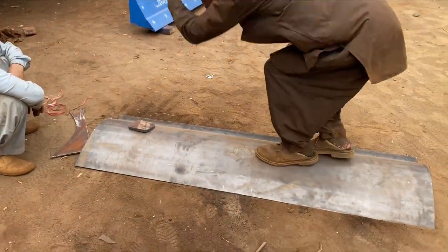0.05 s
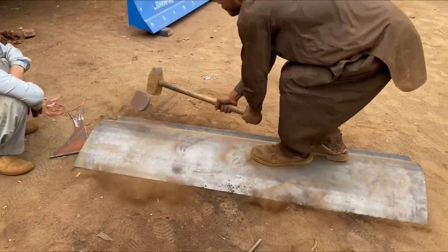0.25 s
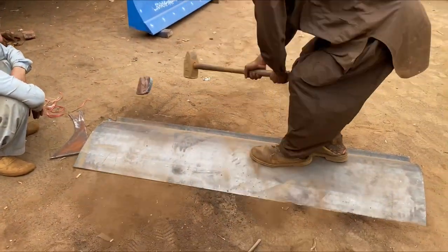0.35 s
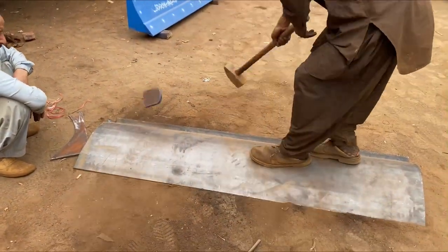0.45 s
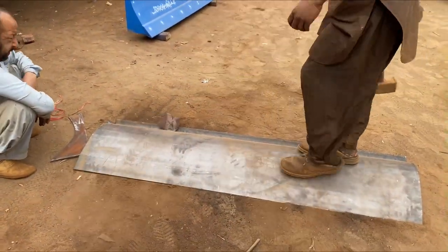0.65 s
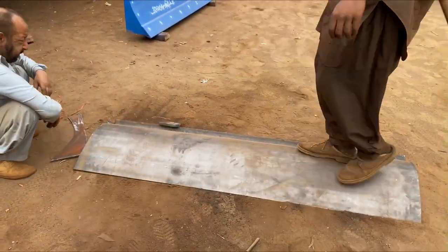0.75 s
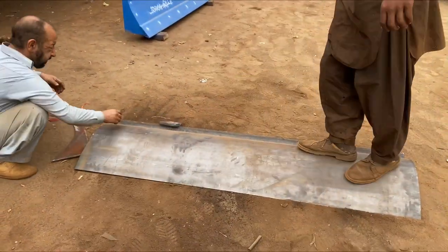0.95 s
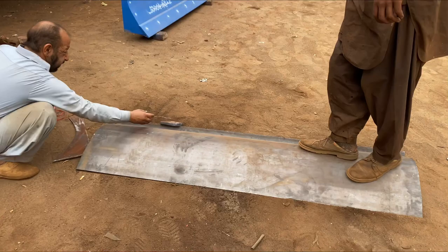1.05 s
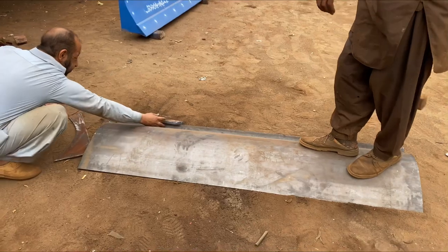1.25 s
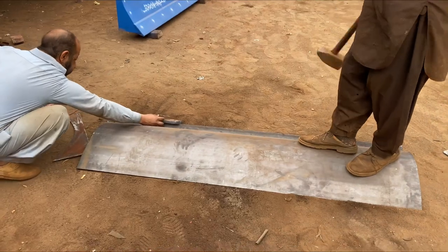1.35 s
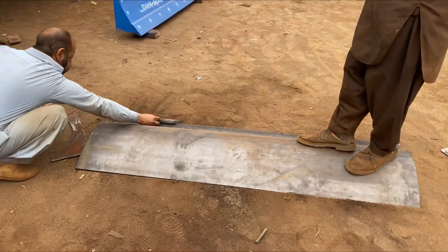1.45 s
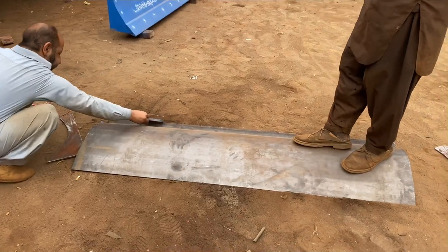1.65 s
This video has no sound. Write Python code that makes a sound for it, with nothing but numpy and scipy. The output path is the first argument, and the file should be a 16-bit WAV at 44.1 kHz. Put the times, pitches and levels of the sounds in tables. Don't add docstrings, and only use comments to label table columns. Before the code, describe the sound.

A sledgehammer smashes a small steel block on a thin plate lying on earth; the plate crashes and chatters, the block rings in flight, lands with a bouncing clang, and is later scraped by hand. Close outdoor stereo.

```python
import sys
import numpy as np
from scipy import signal
from scipy.io import wavfile

SR = 44100
rng = np.random.default_rng(int(sys.argv[2]) if len(sys.argv) > 2 else 0)


def store_pcm(level_fs):
    pcm = np.round(np.clip(level_fs, -1, 1) * 32767).astype(np.int16)
    wavfile.write(sys.argv[1], SR, np.atleast_2d(pcm).T)


def gain_from_db(level_db):
    decades = np.asarray(level_db, float) / 20
    return 10 ** decades


N = 74970
SIDES = np.array([[1], [-1]])

# (pitch [Hz], level [dB per Hz])
YARD_COLOUR = [(15, -45.5), (25, -34.5), (70, -15), (190, 8.5), (256, -8), (516, -10), (818, -23),
               (14000, -51), (16000, -65)]
YARD_EARLY_COLOUR = [(15, -76), (25, -37.5), (74, -4), (200, 4), (439, -20), (489, -15), (14000, -53),
                     (16000, -66)]
# (pitch [Hz], likeness [0 to 1])
YARD_LIKENESS = [(60, 1), (200, 0.3), (950, 0.2), (3770, .1), (15000, 0.091)]
# (pitch [Hz], width [Hz], level over the rumble [dB])
HUM = [(90, 30, -10), (150.3, 14, -8.5), (180, 30, -4), (504, 10, -11.5)]
# (time [s], level [dB])
RUSTLE = [(0, -84), (.6, -51), (1.0, -80.5), (1.2, -88), (1.27, -74), (1.7, -75.5)]

# (time [s], level [dB], rise [s], fall [s], tilt [dB per octave])
BLOW = [
    (.199, -27, 0.002, 0.0046, 2.5),
    (.2033, -17.5, .0007, 0.0013, 5),
    (.207, -13, 0.0015, 0.0037, -2.9),
    (.222, -26.5, .004, 0.027, 1.07),
    (.275, -40, .01, .02, -3.5),
    (.33, -46, 0.013, 0.019, -3.5),
    (.385, -43.5, 0.031, .03, -1.5),
    (.435, -51.5, 0.0089, 0.06, -3),
]
# (pitch [Hz], level [dB per Hz])
BLOW_COLOUR = [(40, -31), (130, 0), (420, -4), (1400, -4.5), (7000, -10.5), (11500, -30), (14000, -29),
               (16500, -28.5)]
# (pitch [Hz], level [dB], 60 dB decay [s])
BLOW_MODES = [(110, -10, 0.045), (143.8, -12.5, 0.25), (174.5, -21.5, .1), (312.3, -27, 0.48),
              (422.5, -8.5, 0.23), (582, -12, .07), (1073, -17, 0.2), (1364, -1.5, 0.052),
              (1460, -22.5, .5), (2810, -28, 0.29), (6324, -19.5, 0.058), (7500, -17.5, .1)]
# (pitch [Hz], 60 dB decay [s])
PLATE_T60 = [(60, 0.13), (200, 0.9), (600, .3), (2000, .3), (5000, 0.087), (9000, .16), (12000, .1),
             (16000, .1)]
# (pitch [Hz], phase [rad])
PLATE_TURN = [(60, 0.15), (150, 0.1), (400, 0.62), (1200, 1.1), (3000, 5.4), (16000, 1.3)]

# (take-off [s], landing [s])
FLIGHT_S = (.204, .547)
# (pitch [Hz], level [dB], 60 dB decay [s])
BLOCK_MODES = [(5669, -34.5, 1.1), (6794, -39, .9), (10940, -52, 1.1), (14380, -47, 1.4)]
# (time [s], level [dB], rise [s], fall [s])
SIZZLE = [
    (.21, -27.5, 0.0033, 0.024),
    (.552, -36, 0.00067, 0.018),
    (.693, -65, 0.0023, 0.014),
    (1.27, -81.5, 0.026, .05),
    (1.66, -79.5, .05, .05),
]

# (time [s], level [dB], rise [s], fall [s], tilt [dB per octave])
LANDING = [
    (.5465, -17, 0.00031, 0.002, 4),
    (.555, -12.5, 0.0038, 0.012, 1.9),
    (.572, -21.5, 0.0037, 0.035, 2.87),
    (.692, -28, 0.00044, 0.018, -1),
    (.734, -26.5, 0.00038, 0.0098, 0.2),
    (.793, -35.5, 0.0095, 0.012, -2.5),
    (.85, -55.5, 0.025, 0.2, -2.6),
]
# (pitch [Hz], level [dB per Hz])
LANDING_COLOUR = [(90, -53), (210, -9), (854, -19), (1450, -12.5), (3470, -20.5), (11500, -46),
                  (14000, -67), (16500, -35)]
# (pitch [Hz], level [dB], 60 dB decay [s])
LANDING_MODES = [(222, -20, .08), (350, -24, .15), (570, -26, .06), (5200, -30, .06), (1665, -26, .1),
                 (1960, -25, .13), (2286, -28, .1), (2422, -35, .2), (4265, -33, .06), (4764, -33, .25),
                 (6450, -30, .06)]
# (pitch [Hz], level [dB], 60 dB decay [s], struck at [s])
CLANG = (1421, -23.5, .42, .556)
# (time [s], level [dB], rise [s], fall [s], tilt [dB per octave])
SLIDE = [
    (1.592, -48, 0.00033, 0.06, -2.7),
    (1.67, -50, 0.008, 0.021, -2.3),
    (1.698, -42, 0.0033, 0.0087, -0.7),
]
# (pitch [Hz], level [dB], 60 dB decay [s])
SLIDE_MODES = [(350, -16, .15), (1421, -18, .2), (1880, -22, .06), (2600, -22, .04), (3100, -14, .05),
               (4265, -18, .25), (5200, -19, .25)]
# (after blow [s], after landing [s], after slide [s])
SETTLE_S = (.43, .7, 1.8)
SETTLE_FALL_S = .05


def rms_one(x):
    return x / np.sqrt(np.mean(x ** 2) + 1e-20)


def at_hz(points, hz):
    table_hz, values = np.array(points)[:, 0], np.array(points)[:, 1]
    return np.interp(np.log(hz), np.log(table_hz), values)


def drift(rate_hz):
    r = np.exp(-2 * np.pi * rate_hz * 40 / SR)
    white = rng.standard_normal(N // 40 + 2002)
    slow = signal.lfilter([1], [1, -2 * r, r * r], white)[2000:]
    return np.interp(np.arange(N) / 40, np.arange(len(slow)), rms_one(slow))


def push(rows, t):
    shapes = []
    for start, db, rise, fall, *_ in rows:
        power = np.where(t < start, -((t - start) / rise / 2) ** 2, (start - t) / fall)
        shapes.append(gain_from_db(db) * np.exp(power))
    return np.array(shapes)


def brightness(tilt_db, hz):
    return gain_from_db(tilt_db * np.log2(max(hz, 250) / 1000))


def ring(force, hz, t60, turn):
    pole = gain_from_db(-60 / (t60 * SR)) * np.exp(2j * np.pi * hz / SR)
    z = signal.lfilter([1], [1, -pole], force + 1e-18)
    return np.array([z.imag, (z * np.exp(1j * turn)).imag])


def bands(low=30):
    edges = low * 2 ** np.arange(0, 9.1, 1 / 3)
    filters = []
    for a, b in zip(edges, edges[1:]):
        filters.append((np.sqrt(a * b), signal.butter(2, [a, b], "band", fs=SR, output="sos")))
    return filters


def widen(mid, side, alike):
    return np.sqrt(1 + alike) * mid + np.sqrt(1 - alike) * side * SIDES


def yard():
    drop_s, fall_s = .2, .2
    warm_up = SR // 4
    early = np.exp(-np.maximum(np.arange(N) / SR - drop_s, 0) / fall_s)
    out, white = 0, rng.standard_normal((2, 2, N + warm_up))
    for k, (hz, sos) in enumerate(bands(22)):
        mid, side = signal.sosfilt(sos, white[k % 2])[:, warm_up:]
        alike = np.clip(at_hz(YARD_LIKENESS, hz), 0, 1)
        colour_db = (1 - early) * at_hz(YARD_COLOUR, hz) + early * at_hz(YARD_EARLY_COLOUR, hz)
        out = out + gain_from_db(colour_db + 2.5 * drift(9)) * widen(mid, side, alike)
    out = rms_one(out)
    for hz, width_hz, db in HUM:
        r = np.exp(-np.pi * width_hz / SR)
        resonance = [1, -2 * r * np.cos(2 * np.pi * hz / SR), r * r]
        hum = signal.lfilter([1, 0, -1], resonance, rng.standard_normal(N + SR))[SR:]
        out = out + gain_from_db(db - 5 * early) * rms_one(hum)
    level_db, early_gain_db, pan_db = -55.5, 13, -1.3
    left, right = gain_from_db(level_db + early_gain_db * early + pan_db * SIDES) * out
    lag_s = 1.6e-4
    return np.array([np.roll(left, int(lag_s * SR)), right])


def rustle():
    sos = signal.butter(2, [1500, 5066], "band", fs=SR, output="sos")
    level_db = np.interp(np.arange(N) / SR, *np.transpose(RUSTLE)) + 0.5 * drift(15)
    return gain_from_db(level_db) * rms_one(signal.sosfilt(sos, rng.standard_normal((2, N))))


def mode_crowd(grit, tilt, colour, draws):
    level_db, spread_db = -23.5, 2
    out, count = 0, len(draws)
    for hz, d in zip(16000 * np.linspace(.06, 1, count) ** 1.6, draws):
        hz = hz * (1 + 0.009 * d[0])
        t60 = at_hz(PLATE_T60, hz) * np.exp(.2 * d[1])
        gain = gain_from_db(level_db + at_hz(colour, hz) + spread_db * d[2]) * (hz / 1000) ** 0.42
        force = brightness(tilt, hz) * d[4:] @ grit
        out = out + gain * ring(force, hz, t60, at_hz(PLATE_TURN, hz) * d[3])
    return out


def strong_modes(modes, shapes, grit, tilt, choke, draws):
    grit_share = .7
    peaks = shapes == shapes.max(axis=1, keepdims=True)
    knocks = grit_share * grit + shapes * peaks
    out = 0
    for (hz, db, t60), d in zip(modes, draws):
        turn = at_hz(PLATE_TURN, hz) * d[3] / 2
        out = out + gain_from_db(db) * choke * ring(brightness(tilt, hz) @ knocks, hz, t60, turn)
    return out


def crack_and_rattle(shapes, tilt, colour):
    crack_db, rattle_db = -6.5, -33.5
    shorter = 0.36
    out, white = 0, rng.standard_normal((2, 2, shapes.shape[1]))
    for k, (hz, sos) in enumerate(bands()):
        crack = brightness(tilt, hz) @ shapes
        keep = gain_from_db(-2 * 60 / (shorter * at_hz(PLATE_T60, hz) * SR))
        tail = np.sqrt(signal.lfilter([1e-2], [1, -keep], crack ** 2))
        loudness = gain_from_db(rattle_db) * tail + gain_from_db(crack_db) * crack
        mid, side = signal.sosfilt(sos, white[k % 2] * 10 * loudness)
        alike = np.exp(-at_hz(PLATE_TURN, hz) ** 2 / 2)
        out = out + gain_from_db(at_hz(colour, hz)) * widen(mid, side, alike)
    return out


def plate(rows, colour, modes, settle_s, count, span):
    first, last = int(span[0] * SR), min(int(span[1] * SR), N)
    t = np.arange(first, last) / SR
    shapes, tilt = push(rows, t), np.array(rows)[:, 4]
    grit = shapes * rng.standard_normal(shapes.shape) / 10
    draws = rng.standard_normal((count, 4 + len(rows)))
    choke = np.exp(-np.maximum(t - settle_s, 0) / SETTLE_FALL_S)
    out = mode_crowd(grit, tilt, colour, draws)
    out = out + strong_modes(modes, shapes, grit, tilt, choke, draws)
    out = out + crack_and_rattle(shapes, tilt, colour)
    return np.pad(out, ((0, 0), (first, N - last)))


def blow():
    return plate(BLOW, BLOW_COLOUR, BLOW_MODES, SETTLE_S[0], count=240, span=(.17, .85)) * gain_from_db(.4 * SIDES)


def flying_block():
    spin_hz, spin_depth, clear_s = 22, .55, .09
    take_off, land = FLIGHT_S
    t, out = np.arange(N) / SR, 0
    click = (np.arange(N) == int(take_off * SR)) * 1.
    for (hz, db, t60), d in zip(BLOCK_MODES, rng.uniform(0, 6.28, (len(BLOCK_MODES), 3))):
        spin = 1 + spin_depth * np.sin(2 * np.pi * spin_hz * t + d[1:, None])
        throb = spin * gain_from_db(1.5 * drift(12))
        out = out + gain_from_db(db) * throb * ring(click, hz, t60, d[0] / 4)
    stop = np.exp(-np.maximum(t - land, 0) / .01)
    return out * stop * np.tanh((t - take_off) / clear_s) ** 2


def sizzle():
    sos = signal.butter(4, [12960, 15360], "band", fs=SR, output="sos")
    hiss = rng.standard_normal((2, N)) + rng.standard_normal(N)
    return push(SIZZLE, np.arange(N) / SR).sum(axis=0) * rms_one(signal.sosfilt(sos, hiss))


def landing():
    return plate(LANDING, LANDING_COLOUR, LANDING_MODES, SETTLE_S[1], count=180, span=(.53, 1.2))


def clang():
    hz, db, t60, start = CLANG
    t = np.arange(N) / SR
    click = (np.arange(N) == int(start * SR)) * 1.
    sung = ring(click, hz, t60, 0.3) * np.tanh((t - start) / .008) ** 2
    choke = .3 + .7 * np.exp(-np.maximum(t - SETTLE_S[1], 0) / SETTLE_FALL_S)
    return gain_from_db(db + 3.0 * drift(14)) * sung * choke


def slide():
    return plate(SLIDE, LANDING_COLOUR, SLIDE_MODES, SETTLE_S[2], count=60, span=(1.5, 1.8))


def scene():
    struck = blow()
    block_on_plate = landing() + slide()
    rumble = yard()
    block_on_plate = (block_on_plate + clang()) * gain_from_db(1.3 * SIDES)
    return struck + block_on_plate + flying_block() + rumble + rustle() + sizzle()


def band_limit(x):
    return signal.sosfilt(signal.butter(12, 16690, fs=SR, output="sos"), x)


def record(dry):
    rounded = 0.78 * np.tanh(dry / 0.9)
    cut = signal.cheby2(10, 60, 16800, fs=SR, output="sos")
    return band_limit(signal.sosfilt(cut, rounded))


dry = scene()
out = record(dry)
store_pcm(out)
```